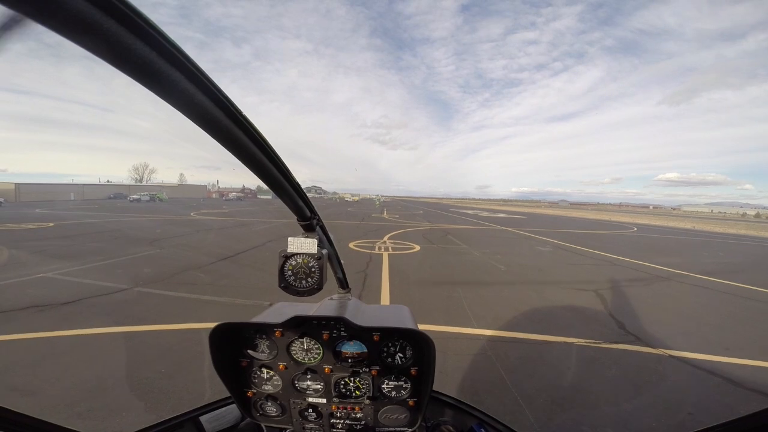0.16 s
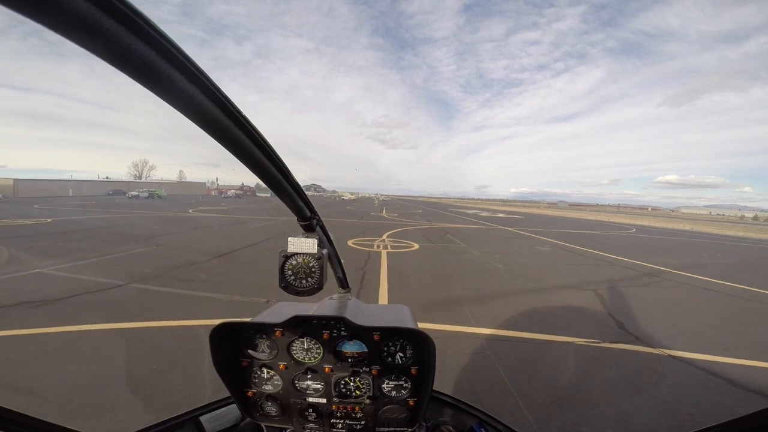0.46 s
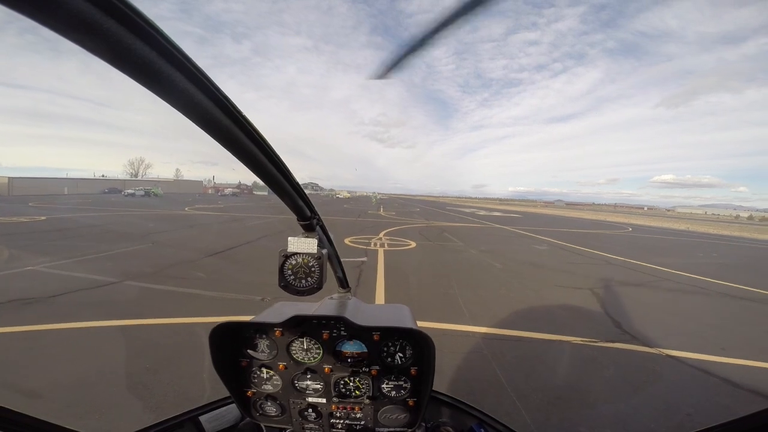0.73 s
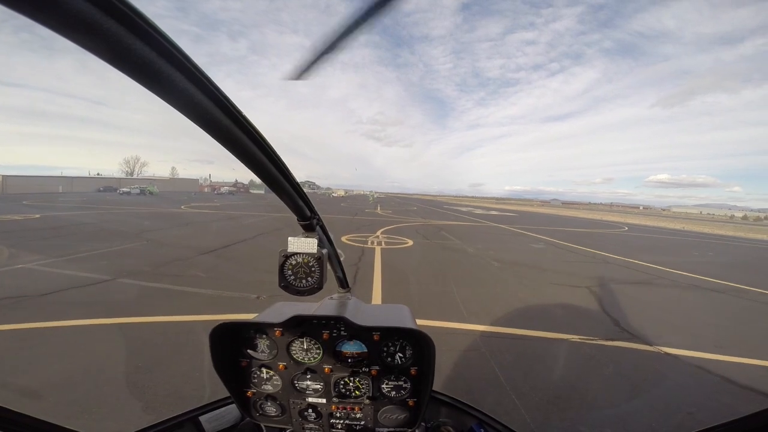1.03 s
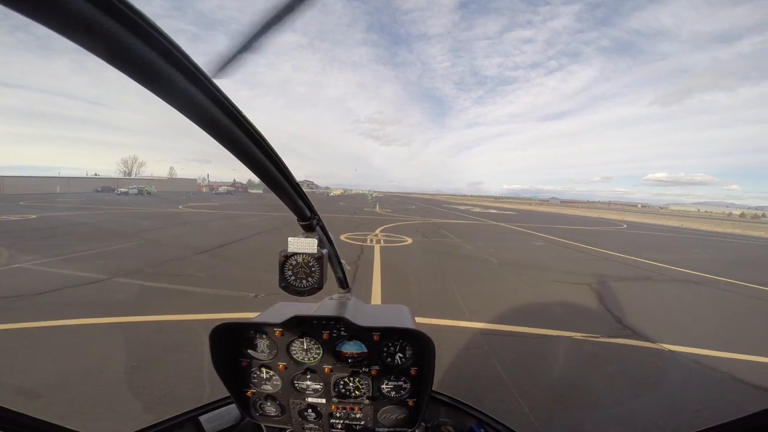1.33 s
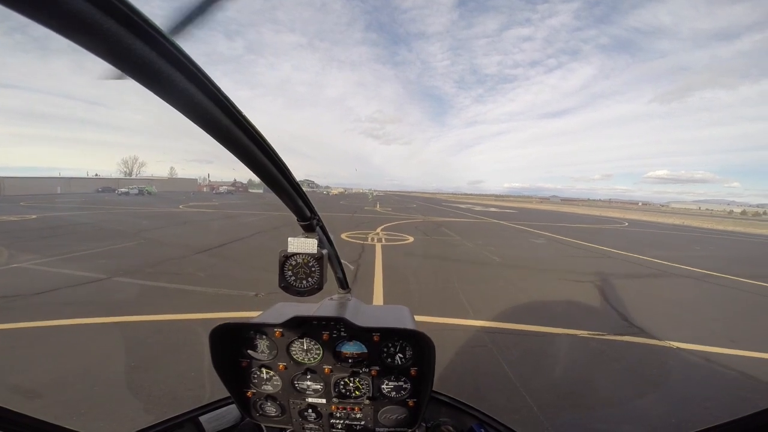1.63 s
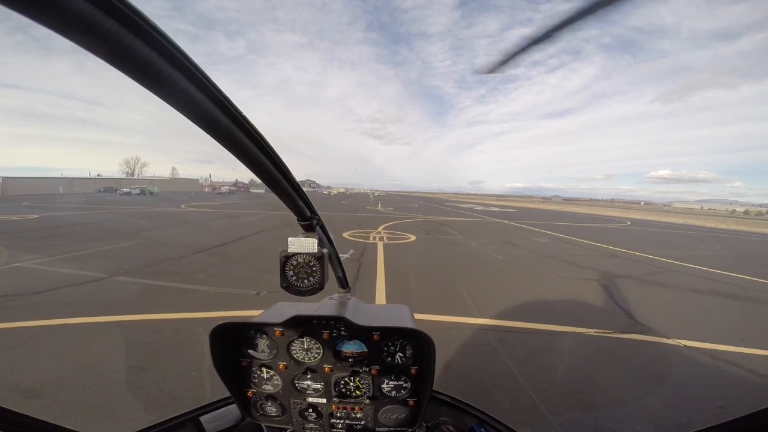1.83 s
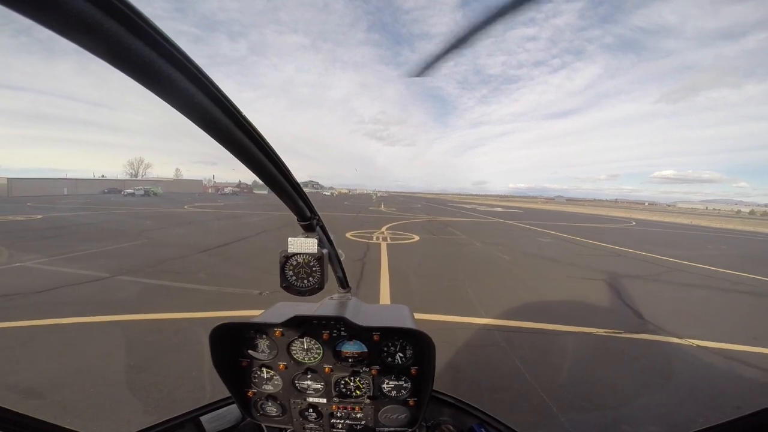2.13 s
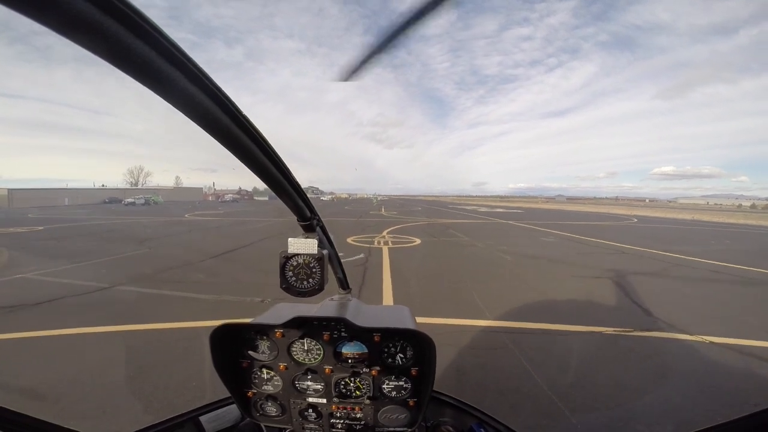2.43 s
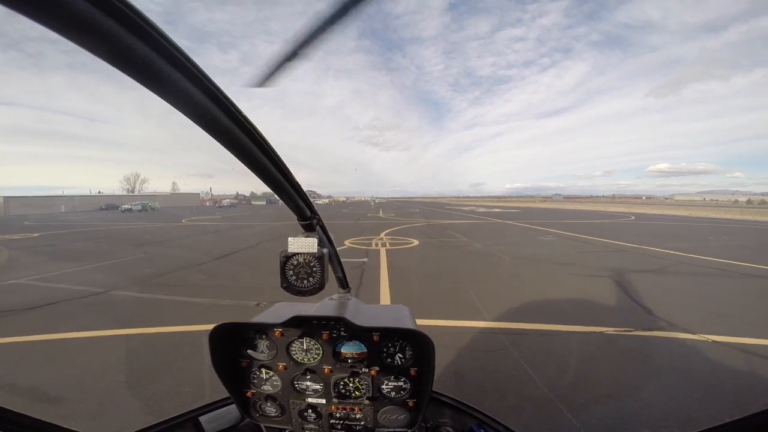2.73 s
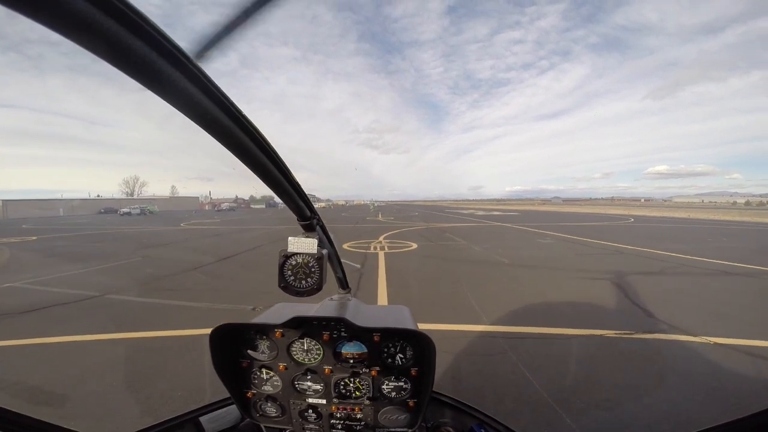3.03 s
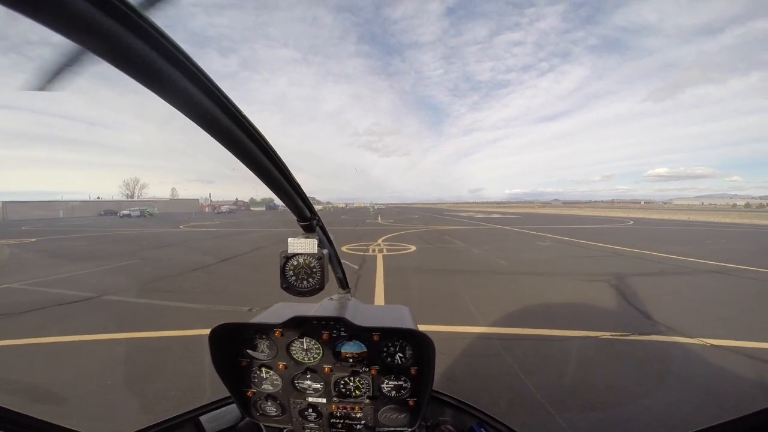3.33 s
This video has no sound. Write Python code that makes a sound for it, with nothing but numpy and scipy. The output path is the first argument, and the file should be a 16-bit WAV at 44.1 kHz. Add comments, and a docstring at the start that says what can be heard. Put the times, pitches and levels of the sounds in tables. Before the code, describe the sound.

A helicopter's piston engine and two-blade rotor drone continuously from 0 to 3.5 seconds, a deep hum near 136 hertz with rotor throbbing about fourteen times a second. Dark cabin roar surrounds it, swelling slightly at the end. Faint dull knocks are scattered throughout; soft low air thumps come near 2.3, 2.9 and 3.4 seconds. The close, muffled camera microphone adds very faint hiss and high electronic whine.

```python
"""Cockpit of a small piston helicopter idling at flight speed on the ground, heard by a camera in a closed housing.
A six-cylinder engine booms on its firing order; two-blade rotor and drive add low lines: all are cosines of
the engine cycle angle. Coloured noise makes the cabin roar and gear tones; knocks are decaying modes,
air thumps short low pulses. The camera adds noise hiss and a thin whine restarted at its frame rate."""
import sys
import numpy as np
from scipy import signal
from scipy.fft import rfft, irfft, next_fast_len
from scipy.io import wavfile
from scipy.ndimage import uniform_filter1d, map_coordinates

SR = 44100
rng = np.random.default_rng(int(sys.argv[2]) if len(sys.argv) > 2 else 0)


def ratio_of_db(decibels):
    """Turn decibels (scalar or array-like) into linear amplitude factors; 0 dB maps to 1."""
    return 10 ** (np.asarray(decibels, float) / 20)


def transcribe(u):
    """Save the signal u as a 16-bit wav file named by the first command-line argument.

    u: samples, shape (n,) or (channels, n), limited to [-1, 1]; the rate is SR.
    q: integer samples, one column per channel.
    """
    v = np.clip(np.atleast_2d(u).T, -1, 1)
    q = np.round(v * 32767).astype(np.int16)
    wavfile.write(sys.argv[1], SR, q)


N = 152586
TIME_S = np.arange(N) / SR


def unit(x):
    """Scale to rms 1."""
    return x / np.sqrt(np.mean(x ** 2))


def curve(rows):
    """Interpolate rows of (s, value) to one value per sample."""
    return np.interp(TIME_S, *np.transpose(rows))


def wobble(knots_per_s):
    """Smooth random curve through standard normal knots."""
    return map_coordinates(rng.standard_normal(200), [TIME_S * knots_per_s])


def noise(spectrum, patchy_db):
    """Coloured noise of rms 1; its gain varies in patches of time and frequency."""
    z = signal.stft(rng.standard_normal(N + 2048), nperseg=1024)[2]
    field = uniform_filter1d(rng.standard_normal(z.shape), size=6, axis=0)
    field = uniform_filter1d(field, size=2, axis=1)
    patchy = signal.istft(z * ratio_of_db(patchy_db * unit(field)), nperseg=1024)[1][:N]
    size = next_fast_len(N + 8192)
    hz, db = np.transpose(spectrum)
    gain_db = np.interp(np.log(np.fft.rfftfreq(size, 1 / SR) + 1), np.log(hz), db)
    return unit(irfft(rfft(patchy, size) * ratio_of_db(gain_db), size)[:N])


# Engine speed. Each row: time in seconds, crank speed in rpm.
SPEED_RPM = [(0.0, 2714.8), (0.49, 2724.7), (0.99, 2721.3), (1.48, 2714.9), (1.98, 2711.9), (2.47, 2713.9),
             (2.97, 2717.2), (3.46, 2713.9)]
START_RAD = .153


def cycle():
    """Angle in radians of the four-stroke cycle, two crank turns each."""
    cycles_per_s = curve(SPEED_RPM) / 60 / 2
    return np.cumsum(cycles_per_s) / SR * 2 * np.pi - START_RAD


WAVER_DB, WAVER_RAD_PER_ORDER, WAVER_KNOTS_PER_S = .5, .012, 6
SCATTER_ORDER = 8.7  # cabin reflections scramble phase above this multiple of the cycle


def line(order, rms_db, shift_rad):
    """Cosine at a multiple of the engine cycle, level and phase slightly unsteady."""
    scatter_rad = rng.uniform(0, 2 * np.pi) * (order > SCATTER_ORDER)
    waver_rad = WAVER_RAD_PER_ORDER * order * wobble(WAVER_KNOTS_PER_S)
    angle = order * cycle() + shift_rad + scatter_rad + waver_rad
    level = ratio_of_db(rms_db + WAVER_DB * wobble(WAVER_KNOTS_PER_S))
    return np.sqrt(2) * level * np.cos(angle)


# Engine lines; every sixth is a firing order.
# Each row: multiple of the four-stroke cycle, rms level in dB before load and waver.
ENGINE_LINES = [(1, -49.1), (2, -48.3), (3, -50.8), (4, -53.9), (5, -51.0), (6, -29.0), (7, -46.0),
                (8, -46.5), (9, -57.5), (11, -61), (12, -63), (13, -64.3), (14, -59.8), (15, -58.9),
                (16, -66.1), (17, -66.8), (18, -65.7), (20, -71.2), (21, -75.1), (22, -76.9), (23, -80.8),
                (24, -84.6), (26, -84.9), (28, -83.1), (30, -84.3), (33, -82.7), (36, -87.6), (40, -93.3)]
# Engine load. Each row: time in seconds, gain in dB.
LOAD_DB = [(0, -2), (.5, -0.4), (1, -0.9), (1.4, 0.7), (1.9, -0.15), (2.3, .5), (2.8, -1), (3.1, 0.6),
           (3.46, -2)]
CYLINDERS = 6
CYCLE_LAG_RAD = .8  # uneven-cylinder lines behind the firing lines


def engine():
    """Firing lines and weaker lines of uneven cylinders, all scaled by load."""
    lines = 0
    for order, db in ENGINE_LINES:
        uneven = order % CYLINDERS > 0
        lines = lines + line(order, db, -CYCLE_LAG_RAD * uneven)
    return ratio_of_db(curve(LOAD_DB)) * lines


# Main rotor lines. Each row: multiple of the blade-pass rate, rms level in dB before slap and waver.
ROTOR_LINES = [(1, -55.2), (2, -49.5), (3, -55.8), (4, -41.8), (6, -51.5), (8, -51.6), (9, -57),
               (11, -46.1), (12, -51.8), (13, -56.5), (14, -52.2), (16, -64), (19, -61.7), (21, -59.6),
               (22, -62.2), (23, -66.7), (24, -63.3), (26, -67.6)]
BLADES_PER_CYCLE = .6
BLADE_LEAD_RAD, BLADE_LAG_RAD = 3.6, 2.9
SLAP_DB, SLAP_KNOTS_PER_S = 2, 12  # blade passes differ in strength


def blade_shift_rad(multiple):
    """Phase of a blade line; lag grows with log of the multiple, smearing each pulse."""
    return BLADE_LEAD_RAD - BLADE_LAG_RAD * np.log(multiple)


def rotor():
    """Harmonics of the blade-pass rate under a common random level."""
    lines = sum(line(k * BLADES_PER_CYCLE, db, blade_shift_rad(k)) for k, db in ROTOR_LINES)
    return ratio_of_db(SLAP_DB * wobble(SLAP_KNOTS_PER_S)) * lines


# Tail rotor and drive lines. Each entry: multiple of the engine cycle.
DRIVE_ORDERS = [1.596, 1.777, 2.596, 2.956, 3.56, 3.636, 4.224, 5.84, 5.944, 10.672]
# Same lines. Each entry: rms level in dB before waver.
DRIVE_RMS_DB = [-52, -53, -57, -51, -56, -55, -54, -53, -53, -58]
BEAT_ORDER, BEAT_RMS_DB, BEAT_SWELL_S = 2.364, -44.5, 1.88


def drive():
    """Tail rotor and drive lines; one just under the fourth blade line beats slowly with it."""
    # in phase with the fourth blade line at the swell, but for waver
    gap_order = 4 * BLADES_PER_CYCLE - BEAT_ORDER
    align_rad = gap_order * cycle()[round(BEAT_SWELL_S * SR)]
    beat = line(BEAT_ORDER, BEAT_RMS_DB, blade_shift_rad(4) + align_rad)
    lines = sum(line(k, db, rng.uniform(0, 2 * np.pi)) for k, db in zip(DRIVE_ORDERS, DRIVE_RMS_DB))
    return beat + lines


# Cabin roar spectrum. Each row: frequency in Hz, relative density in dB.
ROAR_SPECTRUM = [(15, -29), (28, -6), (40, -17.5), (65, -11.5), (95, -2.5), (125, -3), (170, -1), (200, -9),
                 (240, -5), (300, -13.5), (400, -19), (550, -29), (750, -35), (950, -42), (1200, -44.5),
                 (1550, -46.5), (1700, -54.5), (2200, -56.5), (3200, -58.5), (6000, -69.5)]
# Roar swell. Each row: time in seconds, gain in dB.
ROAR_SWELL_DB = [(0, 0), (.5, 2), (1, 0.5), (1.5, 1.5), (2, 1.5), (2.5, 1), (3, 0.5), (3.46, 4.5)]
ROAR_BASE_DB, ROAR_BLADE_DB, ROAR_PATCHY_DB = -41.5, 1, 1.2


def roar():
    """Broad cabin air noise, pumped a little by each blade pass."""
    pump_db = ROAR_BLADE_DB * np.cos(BLADES_PER_CYCLE * cycle())
    level_db = ROAR_BASE_DB + curve(ROAR_SWELL_DB) + pump_db
    return ratio_of_db(level_db) * noise(ROAR_SPECTRUM, ROAR_PATCHY_DB)


# Fuzzy faint tones, probably gears.
# Each row: centre in Hz, distance in Hz from centre to -40 dB skirt, rms level in dB.
GEAR_BANDS = [(631, 10, -77.5), (1080, 19, -83), (2320, 15, -95), (2700, 62, -93.5), (5620, 60, -91.5)]


def gears():
    """Narrow bands of noise."""
    out = np.zeros(N)
    for hz, width_hz, db in GEAR_BANDS:
        band = [(hz - width_hz, -40), (hz, 0), (hz + width_hz, -40)]
        out += ratio_of_db(db) * noise(band, patchy_db=-1)
    return out


# Camera hiss spectrum. Each row: frequency in Hz, relative density in dB.
HISS_SPECTRUM = [(300, -2), (1500, 3), (4000, -1), (8000, -1.5), (12000, -1), (13300, -4.5), (14850, 0),
                 (15000, -9.5), (15300, -10.5)]
HISS_RMS_DB = -71


def camera_hiss():
    """Steady electronic noise."""
    return ratio_of_db(HISS_RMS_DB) * noise(HISS_SPECTRUM, patchy_db=.3)


# Camera whine, harmonics 1 to 5. Each entry: rms level in dB.
WHINE_RMS_DB = [-86.5, -84.5, -82.5, -81.5, -80]
WHINE_HZ, FRAME_HZ, FRAME_START_S = 2926.5, 30000 / 1001, .006


def camera_whine():
    """Harmonic oscillator restarted at every frame."""
    since_frame_s = (TIME_S - FRAME_START_S) % (1 / FRAME_HZ)
    out = np.zeros(N)
    for harmonic, db in enumerate(WHINE_RMS_DB, 1):
        turns = harmonic * WHINE_HZ * since_frame_s + rng.random()
        out += np.sqrt(2) * ratio_of_db(db) * np.sin(2 * np.pi * turns)
    return out


# Dull knocks of loose cabin parts. Each row: start in seconds, gain in dB on the modes.
KNOCKS = [(.225, -44), (.881, -48), (.963, -49), (1.326, -45), (1.922, -48), (2.143, -45), (2.84, -45),
          (2.891, -47), (3.335, -43)]
# Knock modes. Each row: frequency in Hz, mean level in dB, 60 dB decay time in seconds.
KNOCK_MODES = [(430, 0, .04), (580, -5, .035), (760, -10, .03)]


def knocks():
    """Soft blows on a few short modes, mode balance random per blow."""
    out, t = np.zeros(N + SR), np.arange(SR // 8) / SR
    onset = 1 - np.exp(-t / .003)
    for start_s, db in KNOCKS:
        ring = np.zeros(len(t))
        for hz, mode_db, t60_s in KNOCK_MODES:
            decay_db = mode_db + rng.normal(0, 2.6) - 60 * t / t60_s
            ring += ratio_of_db(decay_db) * np.sin(2 * np.pi * hz * t)
        out[round(start_s * SR):][:len(t)] += ratio_of_db(db) * ring * onset
    return out[:N]


# Low thumps of air on the cabin.
# Each row: centre in seconds, pitch in Hz, peak in dB, time from peak to 1/e in seconds.
THUMPS = [(2.335, 35, -29, .04), (2.9, 40, -33, .04), (3.367, 40, -25, .035), (3.433, 42, -29, .02)]


def thumps():
    """Short low pushes: cosines under Gaussian envelopes."""
    out = np.zeros(N)
    for centre_s, hz, db, length_s in THUMPS:
        t = TIME_S - centre_s
        out += ratio_of_db(db) * np.exp(-(t / length_s) ** 2) * np.cos(2 * np.pi * hz * t)
    return out


def scene():
    """Sum of all cabin and camera sounds, one channel."""
    cabin = engine() + rotor() + drive() + roar() + gears() + knocks() + thumps()
    return (cabin + camera_hiss() + camera_whine())[None]


def roll_off(x):
    """The treble ends steeply here."""
    return signal.sosfilt(signal.butter(12, 15300, fs=SR, output="sos"), x)


def record(dry):
    """Turn the dry mix into the output sound."""
    return roll_off(dry)


dry = scene()
out = record(dry)
transcribe(out)
```